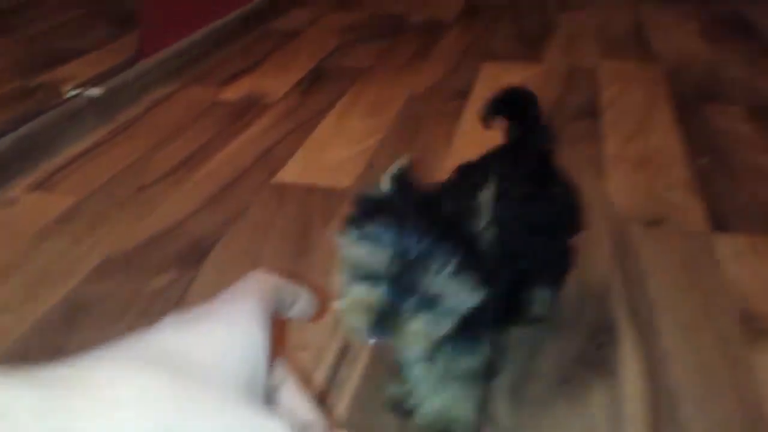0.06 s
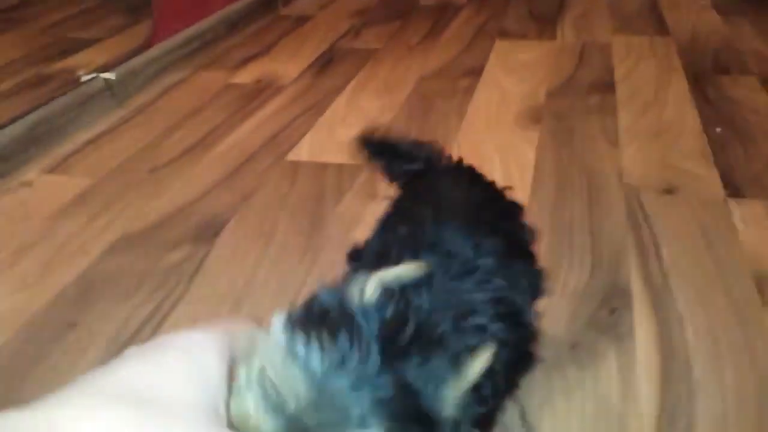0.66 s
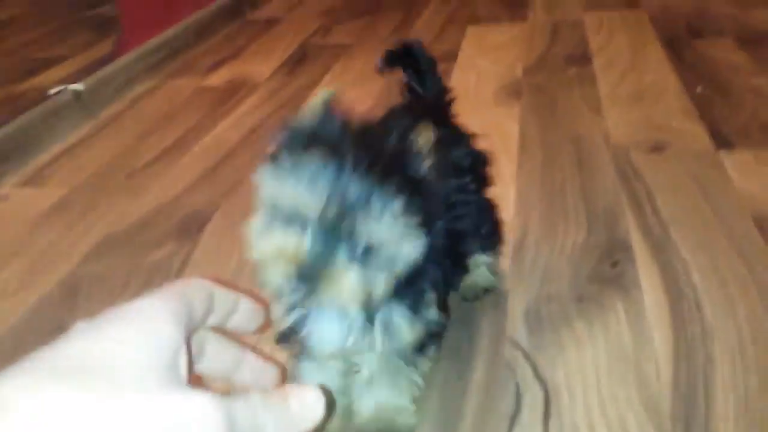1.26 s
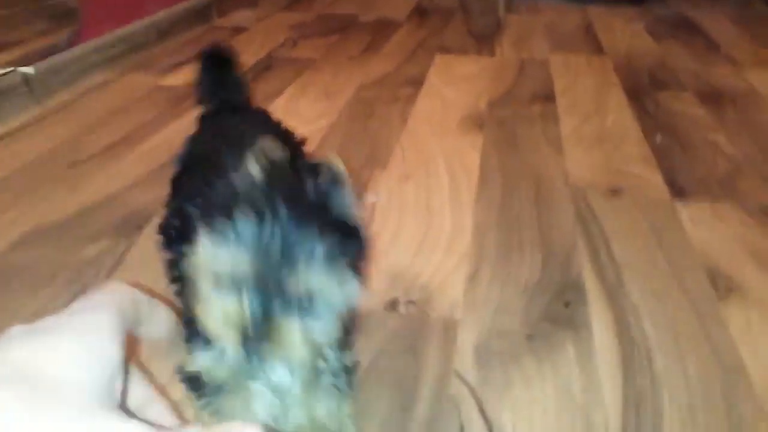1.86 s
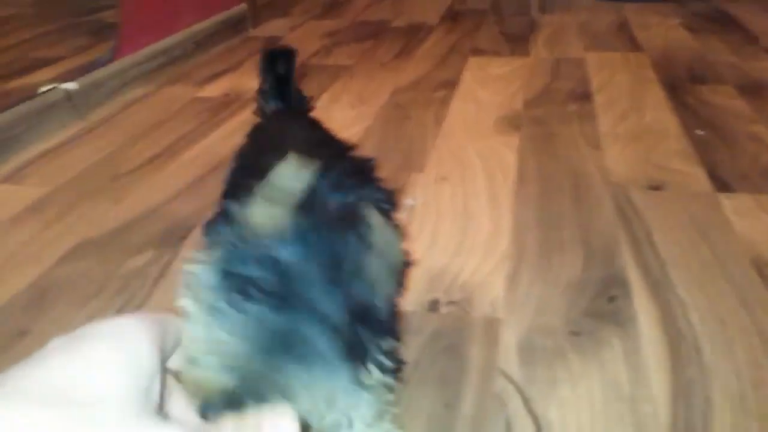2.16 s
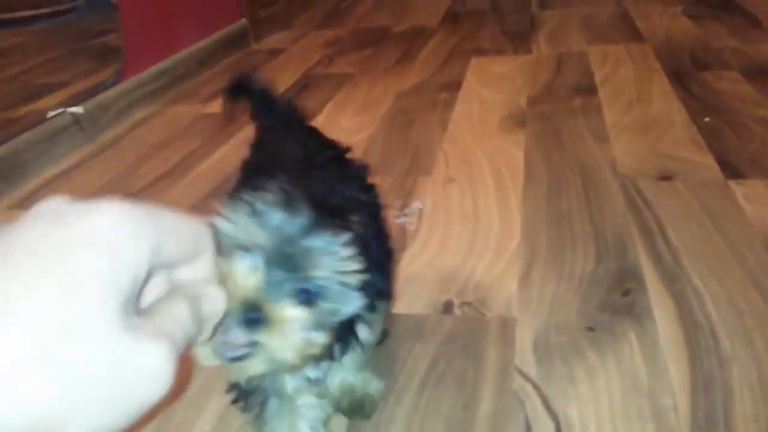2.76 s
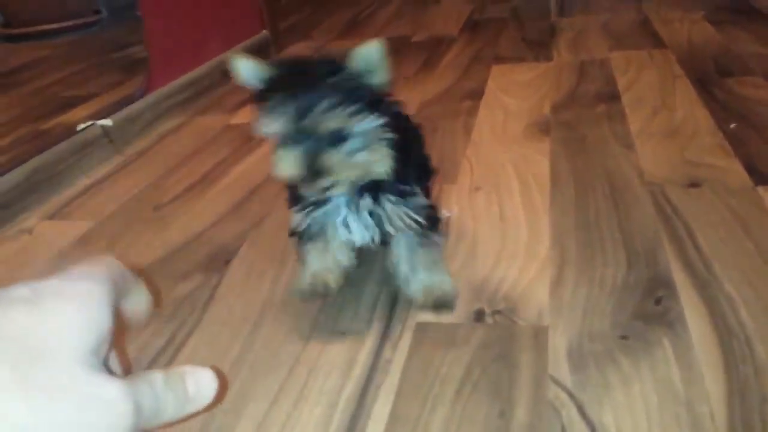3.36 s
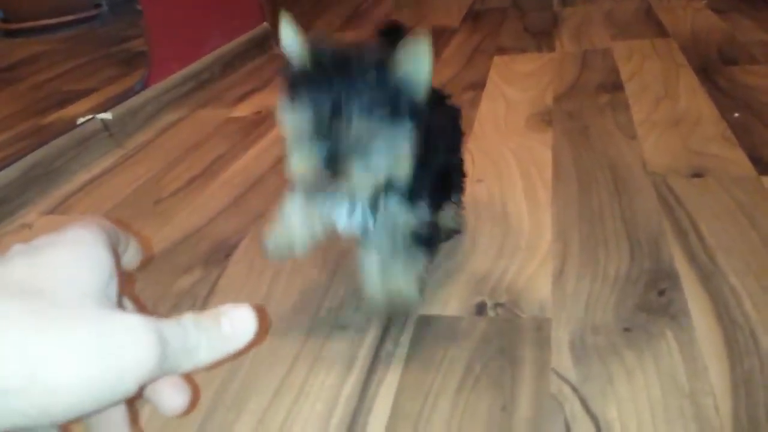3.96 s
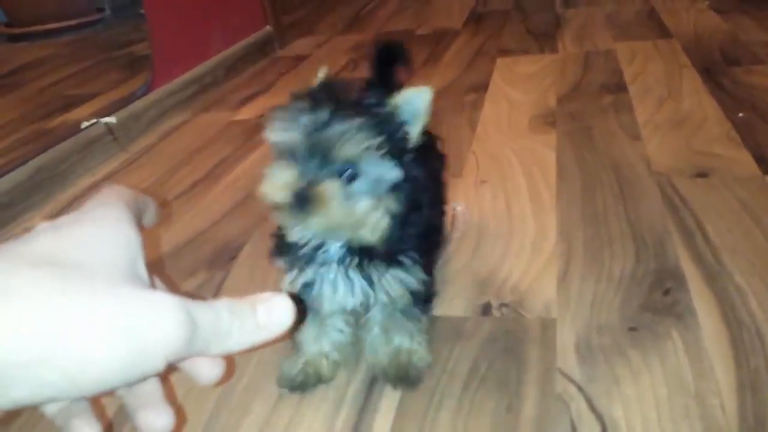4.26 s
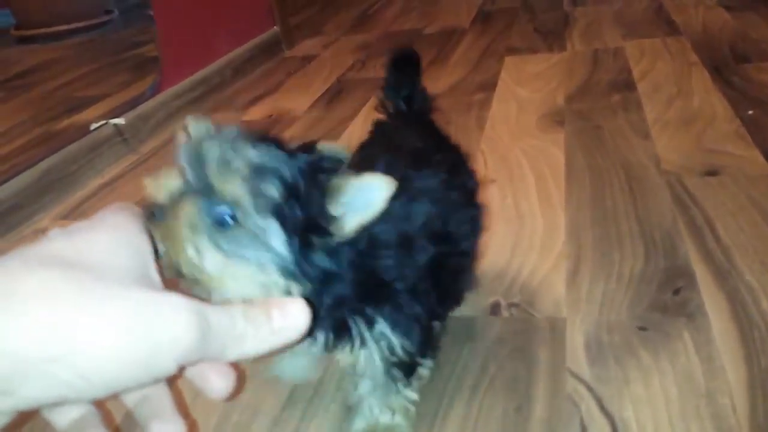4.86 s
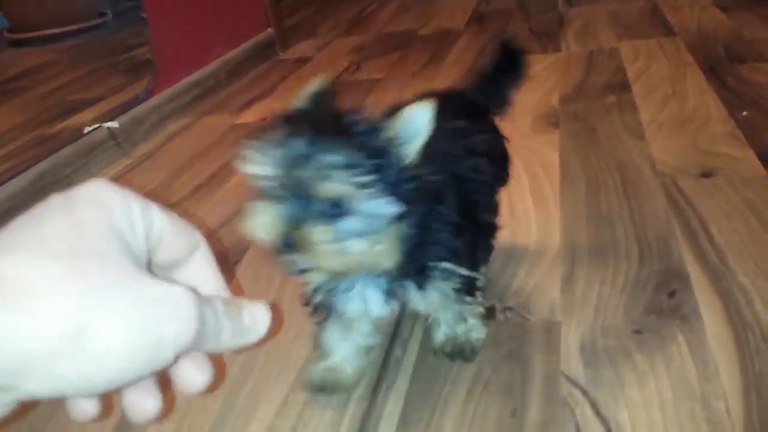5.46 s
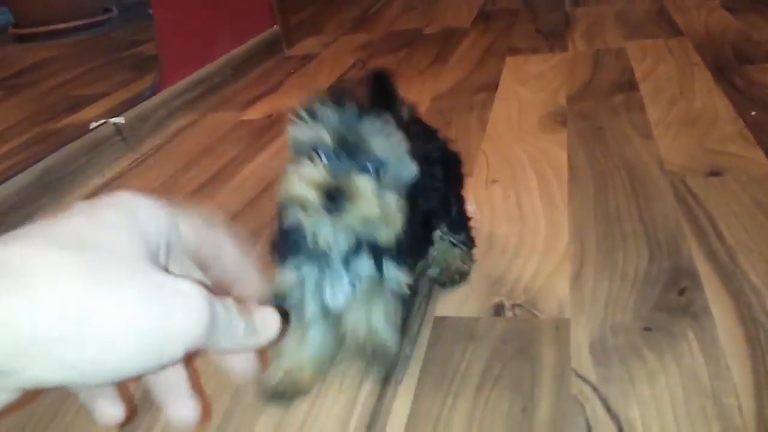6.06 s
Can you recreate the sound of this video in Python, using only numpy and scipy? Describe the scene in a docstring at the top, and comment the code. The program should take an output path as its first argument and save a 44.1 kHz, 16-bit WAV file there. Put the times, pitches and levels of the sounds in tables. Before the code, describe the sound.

Sharp kissing clicks sound close by in an echoing room, pause while a small puppy patters softly over laminate, then return.

```python
"""A small puppy scrambles over laminate in a bare, echoing room, a little way off the microphone:
pads thud and slide on the boards, claws tick. Close to the stereo microphone come two quick runs of
sharp, wet clicks, most likely lip smacks to lure it. Each is a snap, a short hollow ring, a spray of
tiny crackles and a second, lower pop; some end in a squeak. One dry click sounds closer still."""
import sys
import numpy as np
from scipy import signal
from scipy.fft import rfft, irfft
from scipy.io import wavfile
from scipy.ndimage import uniform_filter1d

SR = 44100
rng = np.random.default_rng(int(sys.argv[2]) if len(sys.argv) > 2 else 0)


def unload_audio(sound):
    """Save the sound as a 16-bit wav file, at the path given as the first command line argument."""
    columns = np.transpose(np.atleast_2d(sound))
    # keep every value between -1 and 1, then stretch to whole-number steps
    steps = np.round(np.clip(columns, -1, 1) * 32767)
    wavfile.write(sys.argv[1], SR, steps.astype(np.int16))


N = 269010
TIME = np.arange(N) / SR
AGE = TIME[:SR // 4]  # s since the onset of a short sound
AGE_MS = AGE * 1000
TOP_HZ = 15700


def undb(db):
    """Decibels to gain."""
    return 10 ** (np.asarray(db) / 20)


def unit(x):
    """Scale to rms 1."""
    return x / np.sqrt(np.mean(x ** 2))


def colour(x, points, size=2048):
    """Minimum-phase filter shaped by (f/Hz, level/dB) points on a log-frequency axis."""
    hz, db = np.transpose(points)
    bins_hz = np.maximum(np.fft.rfftfreq(size, 1 / SR), 1)
    gain = undb(np.interp(np.log(bins_hz), np.log(hz), db))
    cepstrum = irfft(np.log(gain))
    cepstrum[1:size // 2] *= 2
    cepstrum[size // 2 + 1:] = 0
    return signal.fftconvolve(x, irfft(np.exp(rfft(cepstrum))))[:len(x)]


def band(x, hz, octaves):
    """A steep-sided band around hz."""
    edges = np.clip(hz * 2 ** (np.array([-.5, .5]) * octaves), 20, SR * .45)
    return signal.sosfilt(signal.butter(3, edges, "band", fs=SR, output="sos"), x)


def add(track, s, sound):
    """Mix a sound into a track at time s."""
    start = max(int(s * SR), 0)
    track[start:start + len(sound)] += sound[:N - start]


def crackle(count, spread_db):
    """Noise made of 16-sample grains of very unequal strength."""
    noise = rng.standard_normal(count)
    grain_db = spread_db * rng.standard_normal(count // 16 + 1)
    return unit(noise * undb(np.repeat(grain_db, 16)[:count]))


def wobble(size):
    """Fast random unsteadiness, rms 1, smoothed over size samples."""
    return unit(uniform_filter1d(rng.standard_normal(len(AGE)), size=size))


def impact(grain, decay_s):
    """The force of a contact: an impulse with a rough, dying tail."""
    force = grain * rng.standard_normal(len(AGE)) * np.exp(-AGE / decay_s)
    force[0] = 1
    return force


def cavity(hz, ring_ms, sag=0.253, overtone_db=-13, overtone_ratio=2.2):
    """A short hollow ring that drops in pitch as the mouth cavity widens."""
    unsteady = 1 + .15 * wobble(size=60)
    pitch_hz = hz * unsteady * (1 - sag * np.tanh(AGE_MS / 11))
    phase = 2 * np.pi * np.cumsum(pitch_hz) / SR
    fade = np.exp(-(AGE_MS / ring_ms) ** 1.64)
    return (np.sin(phase) + undb(overtone_db) * np.sin(overtone_ratio * phase)) * fade


# Spectra of the lips' snap and of the wet spray: f/Hz, gain/dB
SNAP_COLOUR = [(100, -21), (400, -5), (1200, 13.5), (2000, 4), (2900, 8), (4200, 0.5), (6500, -15),
               (9000, 12), (15000, 3)]
SPRAY_COLOUR = [(100, -15.5), (500, 2), (1200, -1.5), (2000, 5), (2900, 0), (4700, 8.5), (7000, 7.5),
                (9000, 3.5), (15000, -6)]
# Lip smacks close to the microphone, levels before filtering:
# t/s, snap level/dB, ring level/dB, ring f/Hz, ring decay/ms,
# spray level/dB, spray decay/ms, gap to the second pop/ms, pop level/dB
LIP_SMACKS = [(0.002, -50, -27.5, 938, 6.9, -33, 51, 12.5, -35.5),
              (0.1883, -22.5, -25.5, 570, 5.9, -35.5, 21, 1, -43.5),
              (0.543, -22.5, -23.5, 1250, 10.3, -24, 13.4, 2.75, -30.5),
              (0.770, -49, -26, 712, 6.9, -33.5, 12.7, 7.8, -30),
              (0.9499, -27, -33, 1060, 5.2, -32.5, 21.4, 13.3, -27),
              (1.1554, -24, -23.5, 1300, 6.5, -23, 13.7, 9.4, -24),
              (1.3561, -21, -19, 1025, 1.6, -22, 7.8, 2.47, -27),
              (5.394, -42, -29.5, 710, 3.1, -31, 15.2, 8, -33),
              (5.6066, -17.5, -19.5, 717, 3.2, -24, 2.8, 4.7, -43),
              (5.7562, -21, -23.5, 850, 0.53, -29, 5.8, 2.93, -32.5),
              (5.9096, -16.5, -31, 1565, 2.7, -21.5, 5.7, 2.6, -96),
              (6.0554, -26, -24, 1455, 5.3, -22, 6.3, 9.9, -19.5)]


def smacks(snap_boost_db=4, pop_snap_db=-5.5, pop_pitch_ratio=0.611, pop_ring_ms=4.85, spots=3):
    """The lip seal snaps, the cavity rings, the wet film crackles; then the rest of the seal pops."""
    snaps, rings, *sprays = np.zeros((2 + spots, N))
    for s, snap_db, ring_db, hz, ring_ms, spray_db, spray_ms, gap_ms, pop_db in LIP_SMACKS:
        snap = undb([snap_db + snap_boost_db])
        add(snaps, s, snap)
        add(rings, s, undb(ring_db) * cavity(hz, ring_ms))
        pop_s = s + gap_ms / 1000
        add(snaps, pop_s, undb(pop_snap_db) * snap)
        add(rings, pop_s, undb(pop_db) * cavity(hz * pop_pitch_ratio, pop_ring_ms))  # a wider cavity
        fade = np.exp(-(AGE_MS / spray_ms) ** 1.23)
        spray_rms = undb(spray_db) * np.sqrt(np.mean(fade ** 2))
        for spot in sprays:
            add(spot, s, spray_rms * unit(crackle(len(AGE), spread_db=6.5) * fade))
    hollow = band(rings, hz=900, octaves=2.93)  # so small a cavity radiates no bass
    wet_film = [colour(spot, SPRAY_COLOUR) / np.sqrt(spots) for spot in sprays]
    return [hollow, -colour(snaps, SNAP_COLOUR)] + wet_film


# Thin squeaks close by, most of them the tail of a smack:
# t/s, starting f/Hz, glide/(octaves per s), length/ms, level/dB
THIN_SQUEAKS = [(0.000, 7080, -23, 1.8, -24), (0.781, 7300, -1, 6.3, -29.5), (0.968, 6260, -2, 4.7, -27.5),
                (0.968, 8600, -7, 11.5, -34), (1.1738, 7450, -5, 4.6, -24.5), (1.365, 6570, -17, 9.6, -31),
                (4.191, 8550, -0.8, 117, -74), (5.367, 1826, -39, 25, -31.5), (5.403, 7630, -6.5, 8.7, -29),
                (5.402, 5100, -24, 7.3, -32.5), (5.6132, 7410, -13, 8.9, -23.5),
                (5.613, 4840, -11, 14, -35)]


def squeaks(overtone_db=-10, fizz_db=-7, waver=0.051):
    """Brief unsteady whistles that fall in pitch, with a wet fizz; the lowest buzzes with overtones."""
    tones, fizz = np.zeros((2, N))
    for s, hz, glide, length_ms, db in THIN_SQUEAKS:
        progress = np.minimum(AGE_MS / length_ms, 1)
        arch = 2 * np.sqrt(progress * (1 - progress))
        swell = undb(db) * arch * (1 + .3 * wobble(size=40))
        unsteady = waver / np.sqrt(length_ms) * wobble(size=12)  # long whistles hold their pitch better
        pitch_hz = hz * 2 ** (glide * AGE) * (1 + unsteady)
        phase = 2 * np.pi * np.cumsum(pitch_hz) / SR
        overtones = sum(np.sin(k * phase) for k in range(2, 5) if k * hz < TOP_HZ / 2)
        add(tones, s, swell * (np.sin(phase) + undb(overtone_db) * overtones))
        add(fizz, s, swell * crackle(len(AGE), spread_db=4))
    return tones + undb(fizz_db) * colour(fizz, SPRAY_COLOUR)


def envelope(s, attack_s, hold_s, release_s):
    """A level that rises at time s, holds and dies away."""
    age = np.maximum(TIME - s, 0)
    return (1 - np.exp(-age / attack_s)) * np.exp(-np.maximum(age - hold_s, 0) / release_s)


# Spectrum of the hissy wash: f/Hz, relative level/dB
WASH_COLOUR = [(60, -13), (200, -5), (500, 5), (1100, -9), (2500, -9), (4500, 1), (7000, 0.5),
               (10000, -2.5), (15000, -15.5)]
# Soft swells of hiss: the first four are room echo after the first lip smacks, the later ones
# paw slides a little way off the microphone: t/s, hold/s, relative level/dB
WASH_SWELLS = [(0.0, 0.25, -46), (0.254, 0.38, -53), (0.632, 0.18, -49), (1.397, 0.083, -51),
               (1.757, .2, -59), (2.062, 0.45, -70), (2.508, 0.22, -59), (2.753, 0.077, -53),
               (3.04, 0.076, -55), (3.527, 0.044, -59.5), (3.891, 0.081, -53.5), (4.502, 0.092, -57.5),
               (4.682, 0.03, -60), (4.909, 0.21, -68.5), (5.27, 0.11, -63)]


def hissy_wash(gain_db=-0.5, tail_db=-18, rustle_db=-71.5):
    """Grainy hiss: room echo after the first smacks and each claw tick in FOOTFALLS, and paw slides."""
    swell_power = sum((undb(db) * envelope(s, attack_s=0.028, hold_s=hold_s, release_s=0.07)) ** 2
                      for s, hold_s, db in WASH_SWELLS)
    tail_power = sum((undb(claw_db + tail_db) * envelope(s, 0.024, hold_s=0, release_s=0.047)) ** 2
                     for s, _, _, claw_db, _ in FOOTFALLS)
    level = np.sqrt(swell_power + tail_power + undb(rustle_db) ** 2)  # fur is never quite still
    hiss = unit(colour(crackle(N, spread_db=3), WASH_COLOUR))
    return undb(gain_db) * level * hiss


# A typical light step, levels relative: pad level/dB, board f/Hz, claw level/dB, claw f/Hz
SOFT_FOOTFALL = (-62, 466, -42.5, 1995)


def shuffle(start_s=1.2, end_s=2, count=7, scatter_db=2.5):
    """The puppy shuffles on the spot: faint steps at random moments, as rows like FOOTFALLS."""
    pad_db, board_hz, claw_db, claw_hz = SOFT_FOOTFALL
    times = start_s + (end_s - start_s) * (np.arange(count) + rng.random(count)) / count
    offsets_db = scatter_db * rng.standard_normal(count)
    return [(s, pad_db + db, board_hz, claw_db + db, claw_hz) for s, db in zip(times, offsets_db)]


# Modes of the laminate floor: multiple of the board's pitch, relative level/dB, t60/s
BOARD_MODES = [(0.151, -25.5, 0.17), (0.287, -19.5, 0.3), (.58, -60, 0.086), (.78, -10, 0.073),
               (.96, 8, 0.039), (1.122, 0, 0.031), (1.322, -16, 0.21)]


def floorboard(hz, detune=0.026):
    """A board rings in damped modes, tuned a little differently at each spot."""
    ring = 0
    for ratio, db, t60 in BOARD_MODES:
        mode_hz = hz * ratio * (1 + detune * rng.standard_normal())
        ring += undb(db) * np.cos(2 * np.pi * mode_hz * AGE) * np.exp(-np.log(1000) * AGE / t60)
    return ring


# Paws landing a little way off the microphone, levels relative:
# t/s, pad level/dB, board f/Hz, claw level/dB, claw f/Hz
FOOTFALLS = [(2.406, -51, 874, -54, 1215), (2.434, -54.5, 730, -51, 1390), (2.545, -76, 503, -39, 6600),
             (2.7129, -35, 588, -20, 5870), (2.9957, -46.5, 537, -37, 5070), (3.072, -53, 489, -41, 6880),
             (3.117, -37.5, 513, -31.5, 1220), (3.1899, -50, 384, -30.5, 7000),
             (3.256, -58, 406, -38, 6100), (3.357, -56.5, 402, -70, 6075), (3.532, -94, 500, -39, 6440),
             (3.72, -67, 516, -50, 5970), (3.8066, -41.5, 566, -39, 5830), (3.8516, -53, 536, -38, 6500),
             (3.9131, -36, 544, -29, 7250), (4.0257, -44.5, 511, -31.5, 7040),
             (4.037, -46.5, 470, -29.5, 5900), (4.3014, -53, 483, -34, 7850), (4.34, -55.5, 378, -44, 5070),
             (4.48, -46.5, 456, -36, 4530), (4.7078, -75, 500, -44.5, 2620),
             (5.0363, -55, 510, -35.5, 5700), (5.18, -58.5, 512, -48.5, 6100)]


def steps(thud_gain_db=-22, tick_gain_db=-31.5, pad_cutoff_hz=1000):
    """A soft pad sets the boards ringing; a claw lands with a dry tick and skids briefly."""
    thuds, ticks = np.zeros((2, N))
    for s, pad_db, board_hz, claw_db, claw_hz in FOOTFALLS + shuffle():
        board = floorboard(board_hz)
        push = impact(grain=0.14, decay_s=0.0056)
        skid = impact(grain=0.36, decay_s=0.0015)
        thud = signal.fftconvolve(board, push)[:len(AGE)]
        add(thuds, s, undb(pad_db + thud_gain_db) * unit(thud))
        add(ticks, s, undb(claw_db + tick_gain_db) * unit(band(skid, claw_hz, octaves=1.68)))
    soft_pad = signal.butter(2, pad_cutoff_hz, fs=SR, output="sos")  # too soft to excite the treble
    return signal.sosfilt(soft_pad, thuds) + ticks


def dry_click(s=4.4565, hz=4750, decay_s=0.0006, ring_db=-49, crack_db=-61):
    """One sharp, dry click right by the microphone, perhaps of the tongue or of teeth meeting."""
    track = np.zeros(N)
    ring = band(impact(grain=0.021, decay_s=decay_s), hz, octaves=0.55)
    crack = rng.standard_normal(len(AGE)) * np.exp(-AGE / decay_s)
    add(track, s, undb(ring_db) * unit(ring) + undb(crack_db) * unit(crack))
    return track


def direct(x, lag_samples=3):
    """The straight path to the microphone reaches the left port just before the right."""
    return np.array([x, np.pad(x, (lag_samples, 0))[:N]])


def close_pair(pair, alike=0.82, alike_hz=800):
    """Microphone ports a hand apart hear long waves alike and short waves unrelated."""
    likeness = alike * np.exp(-(np.fft.rfftfreq(N, 1 / SR) / alike_hz) ** 2)
    mid, side = rfft(pair) * np.sqrt([(1 + likeness) / 2, (1 - likeness) / 2])
    return irfft(np.array([mid + side, mid - side]), N)


# Colour of the bare room's echo: f/Hz, gain/dB
ECHO_COLOUR = [(35, 11), (80, 12), (130, 9.5), (210, 0), (290, 6), (450, -1), (700, -2.5), (1100, 1),
               (1400, 0.5), (2000, -1), (2700, 4), (4500, -1), (7500, -3.5), (15000, -3.5)]
# Its reverberation time: f/Hz, t60/s
ECHO_DECAY = [(100, 2.66), (400, 0.9), (1200, 0.97), (4000, 1.01), (8000, 0.73), (15000, 0.72)]


def room(sources, tail_db, early_db, early_s, build_s=0.0009):
    """Hard walls: early reflections, then a diffuse tail; each source has its own paths to each port."""
    t = TIME[:SR]
    log_centres = np.log([hz for hz, _ in ECHO_DECAY])
    log_bins = np.log(np.fft.rfftfreq(len(t), 1 / SR) + 1)
    bands = [np.interp(log_bins, log_centres, row) for row in np.eye(len(log_centres))]
    fades = [np.exp(-np.log(1000) * t / t60) for _, t60 in ECHO_DECAY]
    build_up = 1 - np.exp(-t / build_s)
    echoes = 0
    for x in sources:
        early, late = rng.standard_normal((2, 2, len(t)))
        tail = sum(irfft(rfft(late) * share, len(t)) * fade for share, fade in zip(bands, fades))
        response = (undb(tail_db) * tail + undb(early_db) * early * np.exp(-t / early_s)) * build_up
        echoes += signal.fftconvolve(x[None], response, axes=1)[:, :N]
    return close_pair(np.array([colour(port, ECHO_COLOUR) for port in echoes]))


# Background at the microphone: f/Hz, relative level/dB
ROOM_TONE = [(25, -21.5), (50, -14.5), (75, -0.5), (130, 0.5), (250, -5.5), (550, -10), (1200, -9),
             (2500, -9.5), (5000, -42.5), (10000, -11.5), (14800, -16.5), (16000, -24)]


def room_tone(db=-70):
    """Faint steady hiss and rumble."""
    pair = np.array([colour(noise, ROOM_TONE) for noise in rng.standard_normal((2, N))])
    return undb(db) * unit(close_pair(pair, alike=0.34))


# The two microphone ports differ mostly in the treble: f/Hz, left minus right level/dB
PORT_BALANCE = [(100, -0.5), (700, 0.5), (1400, 1), (2400, -1.5), (4500, 3), (6000, 0.5), (7500, -8),
                (15000, -9)]


def scene():
    """One microphone in one room: near smacks, a still closer click and the puppy a little further off."""
    lips = smacks() + [squeaks()]
    click = dry_click()
    further = [steps(), hissy_wash()]
    sound = direct(sum(lips)) + room(lips, tail_db=-37.5, early_db=-34.5, early_s=0.031)
    sound += direct(click) + room([click], tail_db=-41.5, early_db=-36.0, early_s=0.022)
    sound += direct(sum(further)) + room(further, tail_db=-35.5, early_db=-24.5, early_s=0.0098)
    left = colour(sound[0], [(hz, db / 2) for hz, db in PORT_BALANCE])
    right = colour(sound[1], [(hz, -db / 2) for hz, db in PORT_BALANCE])
    return np.array([left, right]) + room_tone()


def record(dry, low_hz=45):
    """The recorder thins the deep bass and cuts the top."""
    thinned = signal.sosfilt(signal.butter(2, low_hz, "high", fs=SR, output="sos"), dry)
    return signal.sosfilt(signal.ellip(8, .2, 70, TOP_HZ, fs=SR, output="sos"), thinned)


dry = scene()
out = record(dry)
unload_audio(out)
```